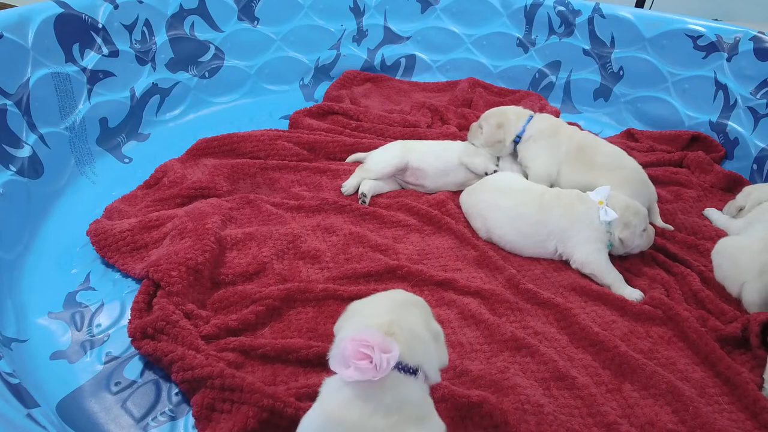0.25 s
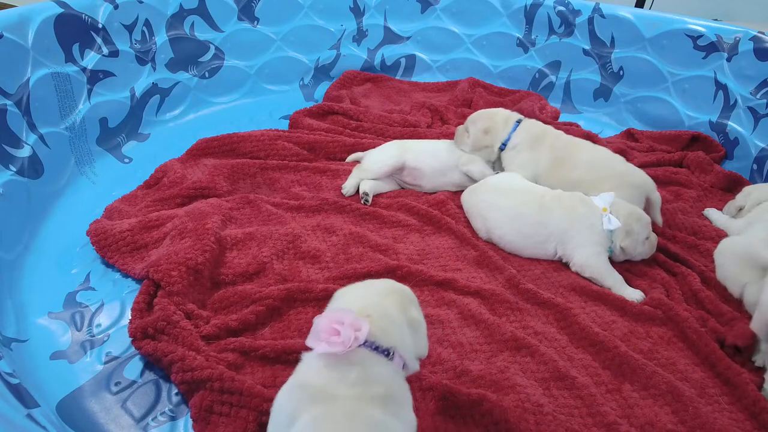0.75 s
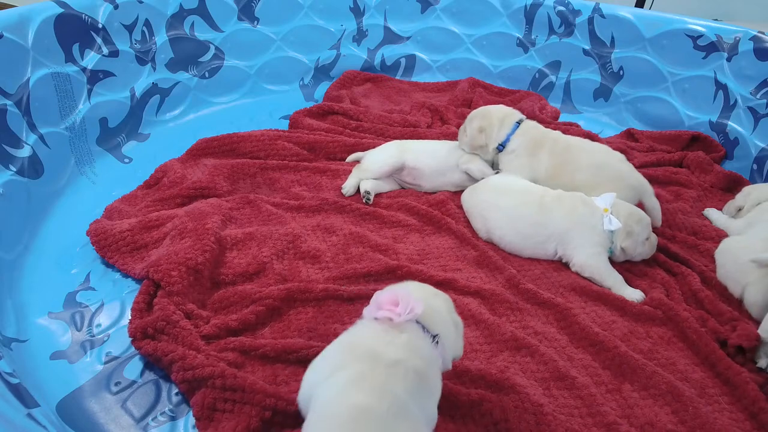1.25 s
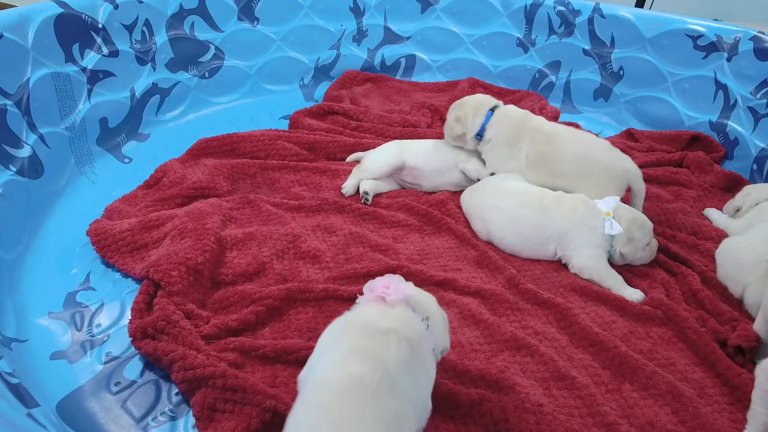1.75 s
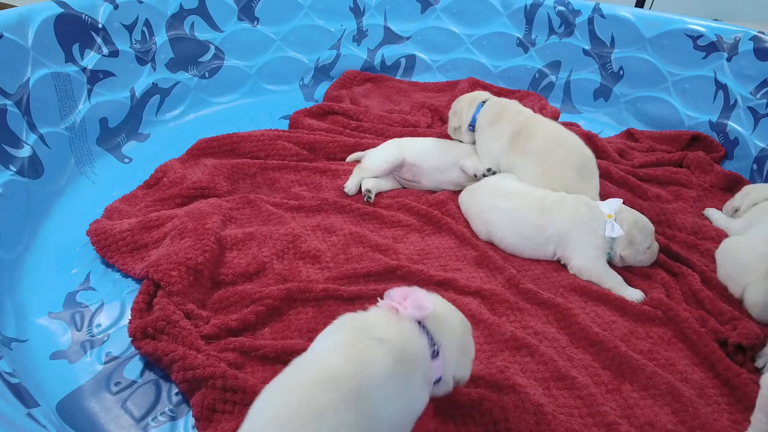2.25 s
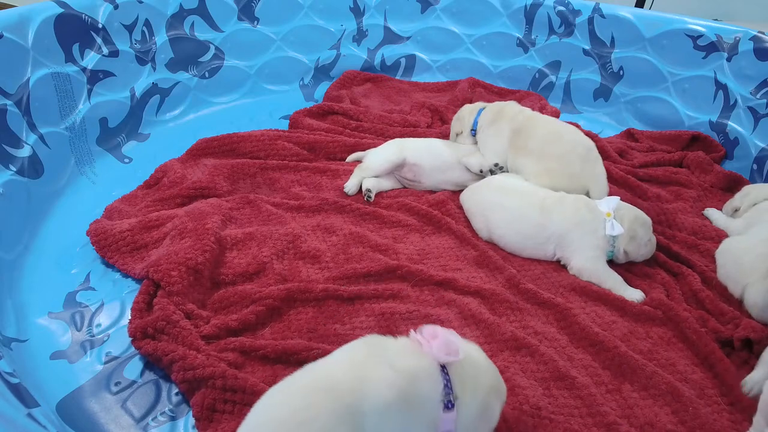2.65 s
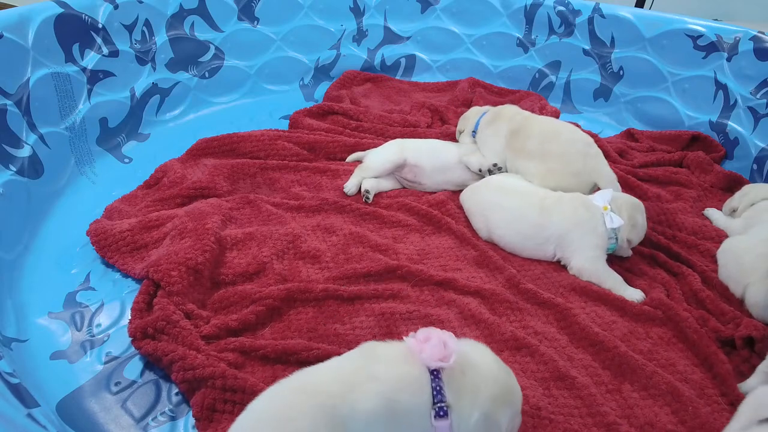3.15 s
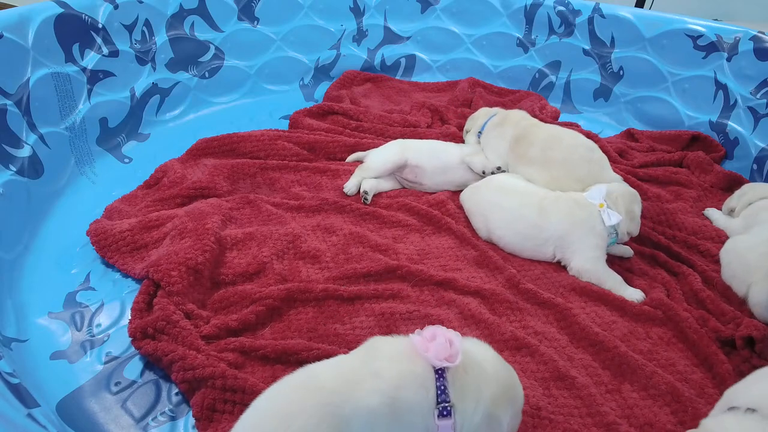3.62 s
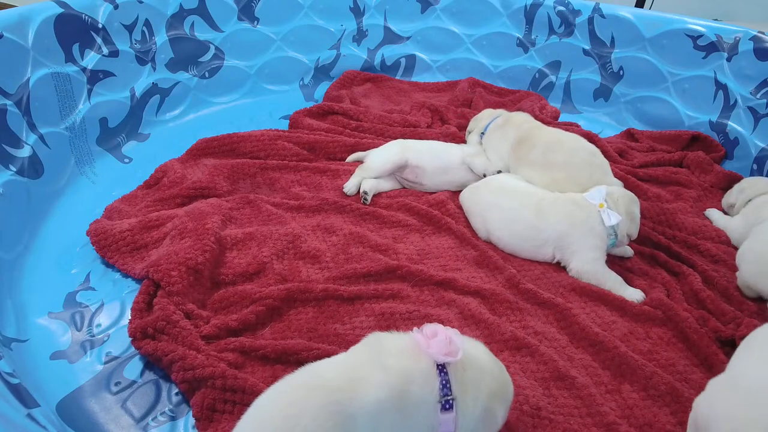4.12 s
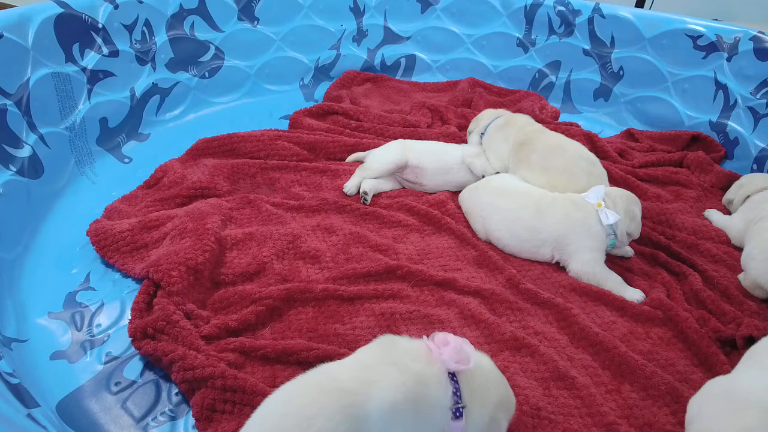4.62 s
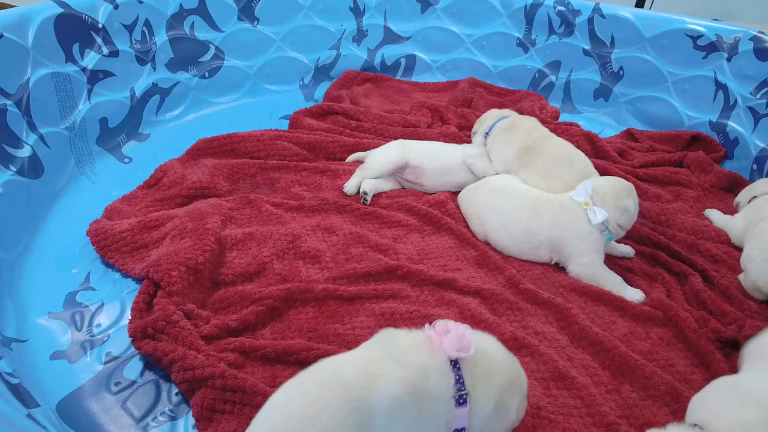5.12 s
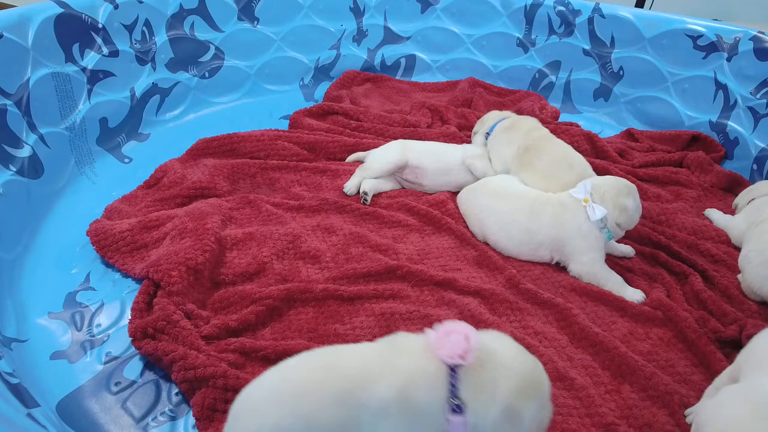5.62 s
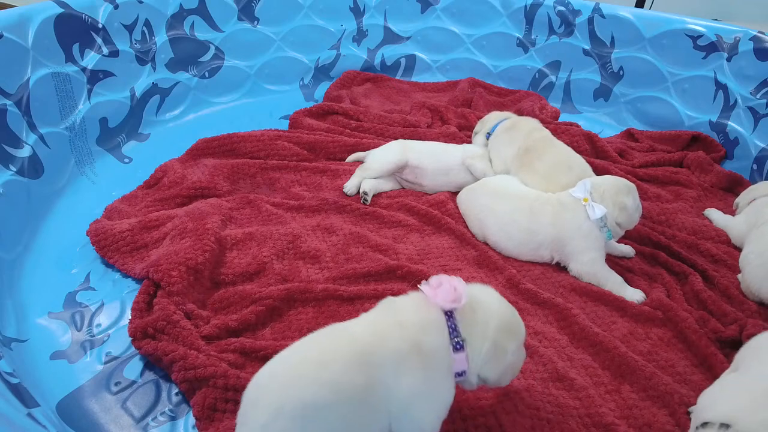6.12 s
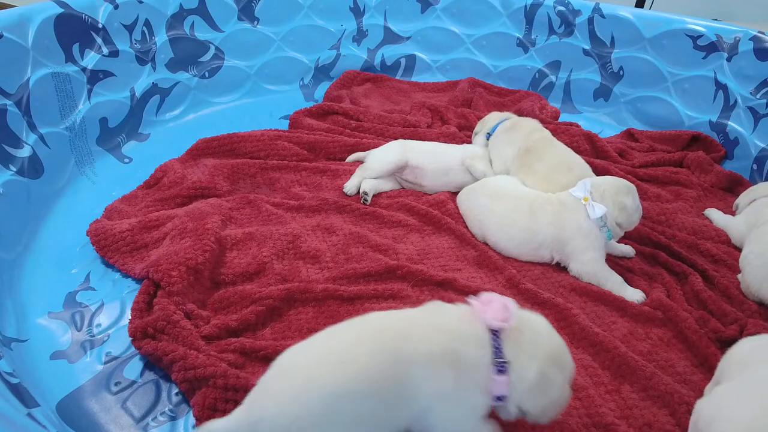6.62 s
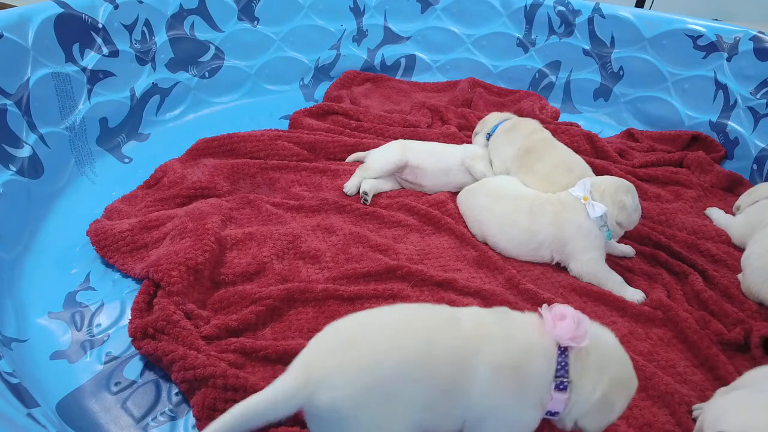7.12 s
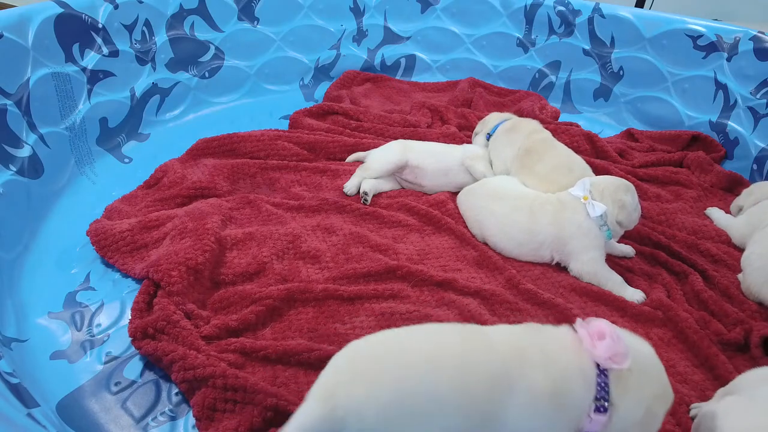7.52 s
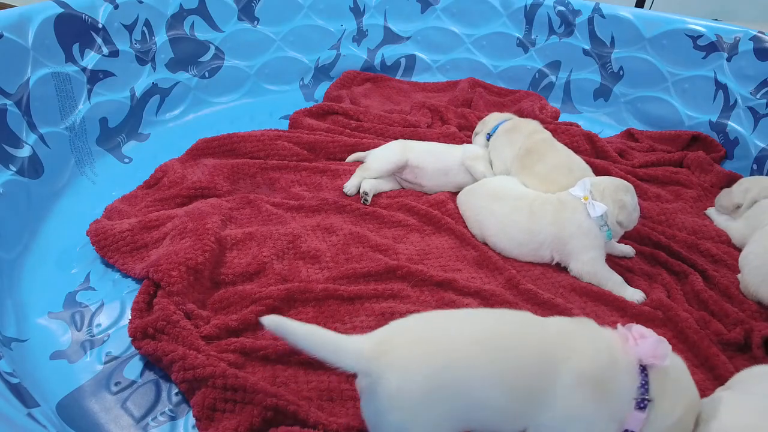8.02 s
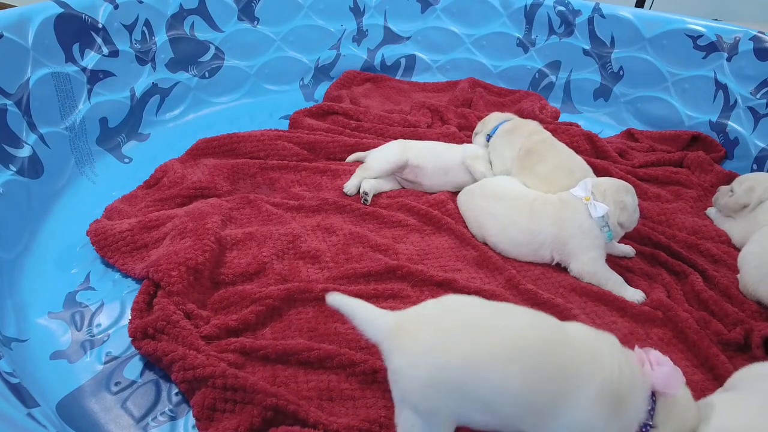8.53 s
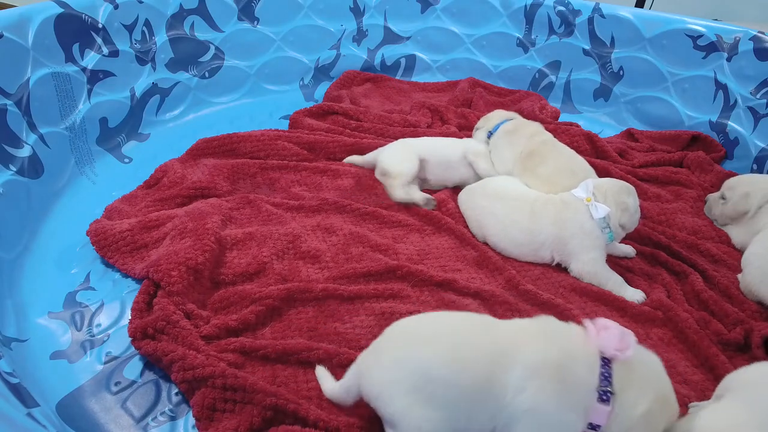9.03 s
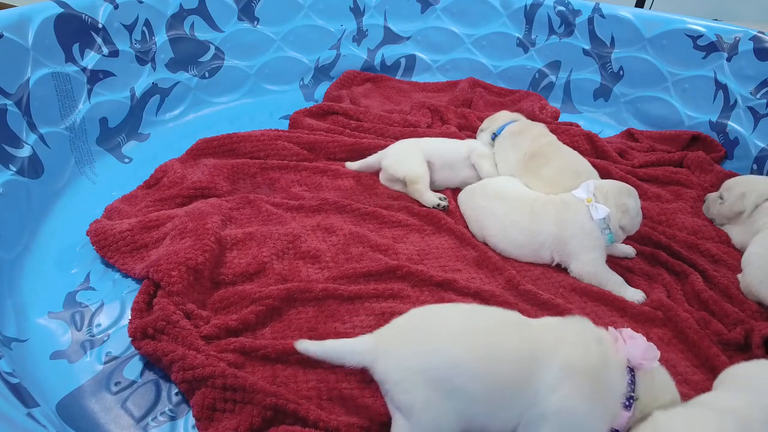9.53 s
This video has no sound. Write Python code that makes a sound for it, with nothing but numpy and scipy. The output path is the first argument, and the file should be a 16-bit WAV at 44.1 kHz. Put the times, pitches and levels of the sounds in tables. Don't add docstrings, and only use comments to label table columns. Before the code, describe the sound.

Tiny pup whimpers, a few snorts and one sharp sneeze, then a high falling whine and grumbling yelps, above soft fan hiss in a small live room.

```python
import sys
import numpy as np
from scipy import signal
from scipy.fft import rfft, irfft
from scipy.io import wavfile
from scipy.ndimage import uniform_filter1d

SR = 44100
rng = np.random.default_rng(int(sys.argv[2]) if len(sys.argv) > 2 else 0)


def bounce(signal):
    frames = np.transpose(np.atleast_2d(signal))
    limited = np.clip(frames, -1, 1)
    pcm = np.round(limited * 32767).astype(np.int16)
    wavfile.write(sys.argv[1], SR, pcm)


def elevation(decibels):
    levels = np.asarray(decibels, float)
    return 10 ** (levels / 20)


N = 430416


def evened(x):
    return x / np.sqrt(np.mean(x ** 2) + 1e-20)


def read(points, hz):
    f, value = np.transpose(points)
    return np.interp(np.log(hz + 1), np.log(f + 1), value)


def add(mix, s, sound):
    part = mix[max(round(s * SR), 0):][:len(sound)]
    part += sound[:len(part)]


def coloured(x, points, tilt_db=0.):
    hz = np.fft.rfftfreq(len(x), 1 / SR)
    gain_db = read(points, hz) + tilt_db * np.log2((hz + 100) / 5000)
    return irfft(rfft(x) * elevation(gain_db), len(x))


def band(x, hz, width):
    r = np.exp(-np.pi * width / SR)
    poles = [1, -2 * r * np.cos(2 * np.pi * hz / SR), r * r]
    once = signal.lfilter([1, 0, -1], poles, x)
    return evened(signal.lfilter([1, 0, -1], poles, once))


def ping(db, hz, cycles):
    u = np.arange(4000) / SR * hz
    swell = np.minimum(3 * u / cycles, 1)
    return 2 * elevation(db) * np.sin(2 * np.pi * u) * np.exp(-u / cycles) * swell


def heater():
    # f/Hz, density/dB per Hz
    fan_air = [(12, -65), (20, -34.5), (91, -7), (123, -13), (196, -14), (501, -4.5), (678, -14.5),
               (845, -8), (1210, -16.5), (1780, -14.5), (2470, -21), (7240, -29), (9020, -35), (13300, -31),
               (14400, -28.5)]
    # f/Hz, width/Hz, level/dB
    casing = [(121.7, 21, -79), (166.4, 2.8, -82.5), (536.8, 7.4, -75), (820, 17, -82), (390.6, 30, -81.5)]
    frames = N // 256 + 5
    real, imaginary, patches = rng.standard_normal((frames, 513, 3)).T
    patches = uniform_filter1d(uniform_filter1d(patches, 10, 0), 16, 1)
    cells = (real + 1j * imaginary) * elevation(1.8 * evened(patches))
    hiss = signal.istft(cells, nperseg=1024, noverlap=768)[1][:N]
    out = elevation(-66.5) * evened(coloured(hiss, fan_air))
    for f, width, db in casing:
        out = out + elevation(db) * band(rng.standard_normal(N), f, width)
    mains = np.sqrt(2) * np.sin(2 * np.pi * 120 * np.arange(N) / SR)
    return out + elevation(-75.5) * mains


def rustle():
    # middle t/s, lift/dB, half
    # length/s
    stirs = [(2.42, 21, 0.054), (3.807, -6, .6), (5.192, 7.5, 0.46), (7.126, 17, 0.35), (7.463, -8, 0.15),
             (9.032, 8.5, 0.41), (9.75, -12, 0.29)]
    # f/Hz, width/Hz, level/dB
    fibre_modes = [(8000, 590, -9.5), (9030, 560, -7.5), (11350, 400, -23), (13200, 580, -9.5)]
    t = np.arange(N) / SR
    stir_db = sum(db * np.maximum(1 - abs(t - s) / half, 0) for s, db, half in stirs)
    fuzz = sum(elevation(g) * band(rng.standard_normal(N), f, w) for f, w, g in fibre_modes)
    strokes = elevation(9.4 * np.tanh(band(rng.standard_normal(N), 86.8, 90)))
    return elevation(-81.5 + stir_db) * evened(fuzz * strokes)


def shaped(row, lift_db, arch, late, loudest, first_db, last_db):
    # pitch f/Hz, octave level/dB
    throat = [(340, 23), (470, 16), (560, -39), (700, -8.5), (850, -19), (1000, -12), (1200, -41),
              (1800, -39)]
    start, length, effort_db, first_hz, last_hz = row
    u = np.linspace(0, 1, num=12)
    glide = u ** (late if last_hz < first_hz else 1 / late)
    hz = (first_hz + (last_hz - first_hz) * glide) * (1 + arch * np.sin(np.pi * u))
    swell_db = np.interp(u, [0, np.clip(loudest, .1, .9), 1], [first_db, 0, last_db])
    return np.transpose([start + length * u, hz, effort_db + swell_db, lift_db + read(throat, hz)])


def call(rasp_db, rough, rows):
    # [f/Hz, level/dB]
    noses = [(0, [(1200, 3), (2400, 3), (2800, -10), (4400, -16), (5200, 7), (6200, 2), (7300, 8.5),
             (8300, -5), (10800, -1), (12500, -16.5)]), (.35, [(1200, 32), (2200, 3), (2800, -5),
             (4300, -5), (5200, 12.5), (6500, 8), (7800, 8), (9000, 5.5), (11000, 3), (13000, -30)]),
             (.9, [(1200, -3), (2200, 1), (2800, -30), (4500, -17), (5300, 11), (6200, 6), (6800, -25),
             (7800, 16), (8800, -4), (12000, -16)]), (5, [(1200, -7), (2200, -6), (2800, -23), (4600, -5),
             (5500, 14.5), (6700, 2), (7700, 9), (8600, -1), (12000, -13)]), (8.4, [(1200, 36), (2400, -3),
             (2900, -16), (4500, -21), (5200, -5.5), (5900, -5), (7200, -12), (8000, -2), (9200, 4),
             (10600, -7.5), (12500, -12.5)])]
    s, *columns = np.transpose(rows)
    nose = [points for start, points in noses if start <= s[0]][-1]
    t = np.arange(s[0], s[-1], 1 / SR)
    hz, effort_db, octave_db = (uniform_filter1d(np.interp(t, s, c), 200, mode="nearest") for c in columns)
    rough = np.clip(rough, 0, 1)
    slow, catches, air = rng.standard_normal((3, 15925))
    slow, air = slow[:len(t)], air[:len(t)]

    shake = evened(uniform_filter1d(uniform_filter1d(slow, 60), 60))
    growl = band(catches, 75.7, 72.7)[-len(t):]
    sag = .25 * shake - .3 * np.minimum(growl, 0) ** 2
    phase = 2 * np.pi * np.cumsum(hz * np.maximum(1 + rough * sag, 2 / 3)) / SR
    swing = np.maximum(1 + 2.4 * rough * growl, .1)

    upper = 0
    for k in range(3, 20):
        audible = k * hz < 15000
        upper = upper + elevation(read(nose, k * hz)) * audible * np.cos(k * phase + k * k)
    breath = evened(coloured(air * (1 + np.cos(phase)), [(600, -41)] + nose + [(16000, -43)]))
    rasp = elevation(rasp_db + 0.68 * (effort_db - effort_db.max()))
    rasp = rasp * np.minimum((t - t[0]) / 0.03, 1)
    folds = np.sin(phase) + elevation(octave_db) * np.sin(2 * phase)
    voice = np.sqrt(2) * swing * (folds + elevation(-1) * rasp * upper)
    fade = np.minimum((t - t[0]) / .018, (t[-1] - t) / .008)
    edge = np.sin(np.pi / 2 * np.minimum(fade, 1)) ** 2
    return elevation(effort_db) * edge * (voice + elevation(5.0) * rasp * breath)


def calls():
    # start t/s, length/s, effort level/dB, first f/Hz, last f/Hz
    cries = [(.06, 0.056, -52, 1006, 1054), (.15, 0.056, -55, 993, 1075), (.395, 0.0167, -43.5, 988, 976),
             (.998, 0.07, -48, 820, 904)]
    grumbles = [(0, .035, -63, 952, 852), (.078, .12, -55, 798, 719)]
    cheeps = [(.69, 0.027, -40.5, 1232, 1084), (3.2, 0.031, -39.5, 992, 1033),
              (3.44, 0.075, -39, 1194, 1151), (3.767, 0.052, -42.5, 1214, 1090),
              (5.272, 0.047, -33.5, 1025, 974)]
    squeaks = [(5.737, 0.048, -39, 803, 566), (9.135, 0.0456, -46, 793, 1163),
               (9.715, 0.042, -50.5, 607, 634)]
    yips = [(.966, 0.11, -47.5, 1200, 1219), (1.05, 0.043, -44.5, 874, 628),
            (2.4, 0.031, -38.5, 1762, 1715), (2.428, 0.095, -44, 1297, 1248),
            (2.472, 0.068, -42.5, 1444, 1354), (2.508, 0.056, -44, 1190, 1164),
            (2.816, 0.099, -47.5, 1250, 1239), (5.29, 0.06, -43.5, 848, 991),
            (9.126, 0.071, -37, 633, 770.5), (9.295, 0.027, -39, 682, 654)]
    growls = [(1.05, 0.075, -45.5, 1135, 904), (2.85, 0.076, -42, 1280, 1216)]
    snarls = [(2.835, 0.125, -44.5, 1040, 898)]
    moans = [(9.4, 0.22, -50.5, 707.4, 813)]
    rasps = [(6.88, 0.066, -49.5, 1170, 1002), (6.884, 0.045, -55, 820, 814),
             (6.89, 0.061, -56, 1605, 1617)]
    blips = [(9.34, 0.033, -40.5, 1000, 940), (9.362, 0.045, -35.5, 710, 607),
             (9.365, 0.069, -43, 1100, 970), (3.815, 0.05, -48.5, 940, 1120), (.54, .13, -44, 900, 970),
             (2.125, 0.025, -57.5, 1180, 1030), (3.812, 0.03, -50, 1010, 900)]
    whimpers = [(3.468, .075, -44.5, 1248, 1240), (3.49, 0.085, -46.5, 1005, 928)]
    sighs = [(3.147, 0.105, -36, 1245, 1180), (0.066, 0.13, -51, 1260, 1100)]
    # t/s, pitch f/Hz, effort level/dB, octave level/dB
    first_yip = [(.094, 786, -43, -16), (.11, 775, -37.5, -4), (.125, 843, -39.5, -4),
                 (.138, 941, -39.5, 0), (.147, 823, -40, -3.5), (.165, 801, -36.5, -22),
                 (.19, 795, -45.5, -8), (.207, 740, -46, -24)]
    yelp = [(.402, 683, -33, -8), (.422, 777, -40, 0.5), (.432, 1009, -40.5, 7.5), (.445, 896.5, -34.5, -3),
            (.465, 926, -36, 2.5), (.49, 976.4, -34, 4), (.503, 982, -30, 3), (.512, 805, -39.5, 2),
            (.525, 650, -32, 4)]
    hook = [(7.224, 912, -46.5, -25.5), (7.238, 850, -39.5, -44), (7.248, 712, -39.5, -16),
            (7.258, 786, -39, -13.5), (7.267, 877, -33.5, -17), (7.29, 880, -44.5, -31)]
    whine = [(8.536, 1294, -43, -33), (8.57, 1464, -51.5, -34), (8.62, 1850, -55.5, -37),
             (8.7, 1756, -40.5, -58), (8.76, 1842, -45, -40), (8.8, 1780, -39.5, -35),
             (8.825, 1657, -37, -35), (8.852, 1374, -40.5, -31)]
    wail = [(8.793, 1506, -39, -38), (8.82, 1237, -45, -44), (8.85, 886.4, -42, -4),
            (8.89, 850.4, -47.5, -2.5), (8.915, 855, -41.5, -6.5), (8.935, 766.6, -41.5, -15),
            (8.96, 871, -48, -4), (8.99, 774, -55, -3)]
    reply = [(9.09, 1027, -56, 4), (9.13, 912.3, -41.5, -14), (9.148, 1002, -39, -8),
             (9.178, 1021, -40.5, -12.5), (9.2, 896, -37.5, -14), (9.225, 790, -35.5, -12),
             (9.26, 752, -38, -26)]
    steady = [(6.912, 959, -40, -32), (6.93, 927, -30.5, -38), (6.946, 933, -29.5, -32),
              (6.965, 879, -33, -6), (6.976, 899, -45, -12), (6.995, 943.5, -33, -10.5),
              (7.022, 917, -32, -22), (7.031, 910, -39.5, -29), (7.105, 917, -53, -12)]
    lead_in = [(2.045, 1380, -61, -45), (2.08, 1502, -61, -45), (2.098, 1550, -44, -45),
               (2.114, 1569, -46.5, -45), (2.126, 1473, -63, -45), (2.143, 1470, -47, -45),
               (2.16, 1570, -47.5, -45), (2.175, 1510, -43, -45)]
    low_whine = [(9.155, 353.4, -52, -4), (9.19, 374.5, -50, 11), (9.21, 458.5, -40.5, 2),
                 (9.24, 457.3, -41, 6.5), (9.265, 473, -41, 1), (9.315, 491, -54, -8)]
    groan = [(9.44, 555, -38, -12), (9.48, 564.3, -51, -16), (9.52, 549, -44, -19), (9.55, 520, -42, -12),
             (9.6, 476.6, -57, -17), (9.643, 516, -51, -23)]
    drop_call = [(.5, 467, -47, -5), (.515, 489, -34, -2), (.53, 487, -50, 12), (.54, 492, -43.5, 2),
                 (.56, 477, -39, -4)]
    rise_call = [(5.355, 1020, -43, -16), (5.37, 1066, -43, -18), (5.39, 1092, -44, -33),
                 (5.41, 1094, -45, -30), (5.43, 1102, -46, -19), (5.46, 1105, -51, -26),
                 (5.49, 1090, -53, -25), (5.53, 1119, -60, -21), (5.553, 1136, -48, -24)]
    clear, husky, growly = .045, .1, .25
    manners = [
        (cries, -25, 0.071, -3, 16.5, 0.0115, 1.14, 0.53, 5.4, 1),
        (grumbles, -21, 0.25, -.1, -2, 0.15, 1.1, 0.64, 16, 15),
        (cheeps, -43.5, clear, -3.5, -14, 0.0061, 1.4, 0.89, -14.5, -1.3),
        (squeaks, -49, clear, -2.6, -3.5, 0.0087, 1.53, 0.16, 1.2, -1),
        (yips, -29, clear, 0.27, -0.56, 0.00855, 2.2, 0.12, 2.7, -1.7),
        (growls, -28, 0.16, -4, -23, 0.008, 2.7, 0.62, 0.83, 4.2),
        (snarls, -36, 0.37, -5, -29, .02, 1.5, 0.9, -7.5, -2),
        (moans, -37, growly, -1.8, -5, 0.0086, 2.3, 0.75, -0.71, -20),
        (rasps, -36, growly, 4, -2.2, 0.0089, 1.15, 0.39, -2.5, -2),
        (blips, -37, clear, -7.5, -10.5, 0.0094, 1.49, 0.2, -1.5, -0.87),
        (whimpers, -32, 0.061, -5, -11, 0.0203, 0.92, 0.087, -8, -6.5),
        (sighs, -45, clear, -9, -13, 0.0089, 1, .55, -17, -19)]
    # curve, rasp/dB, roughness 0-1, room send/dB
    voices = [
        (first_yip, -31.5, 0.075, -6.5), (yelp, -21.5, 0.0575, -5),
        (hook, -42.5, clear, -.1), (whine, -33.5, 0.0194, -.1),
        (wail, -23.5, 0.0694, -.1), (reply, -22.5, 0.0407, -1.3),
        (steady, -58, 0.023, -11), (lead_in, -44, 0.021, -1),
        (low_whine, -41, husky, -6.5), (groan, -57, 0.207, -6.5),
        (drop_call, -50, clear, -13), (rise_call, -24.5, husky, -9)]
    for rows, rasp_db, rough, send_db, *shape in manners:
        voices += [(shaped(row, *shape), rasp_db, rough, send_db) for row in rows]

    near, sent = np.zeros((2, N))
    for rows, rasp_db, rough, send_db in voices:
        voice = call(rasp_db, rough, rows)
        add(near, rows[0][0], voice)
        add(sent, rows[0][0], elevation(send_db) * voice)
    return near, sent


def clicks():
    # t/s, peak level/dB, f/Hz, decay/cycles
    smacks = [(0.443, -32, 6500, 2.3), (0.448, -35.5, 3040, 2.3), (0.449, -39, 4800, 4.1),
              (1.731, -53, 5520, 30.), (1.729, -57, 2920, 15), (1.745, -47.5, 4220, 10),
              (1.748, -45.5, 5900, 13), (1.748, -47, 5200, 12), (1.746, -41, 7000, 3.5),
              (1.749, -48, 8700, 11), (1.754, -69, 4670, 440), (2.169, -44.5, 3560, 14),
              (2.174, -46, 4050, 8.8), (2.175, -49, 5200, 9), (2.175, -49, 5830, 8),
              (2.339, -42, 5600, 2.5), (2.176, -41, 8000, 5), (2.176, -37, 12500, 3.4),
              (3.415, -52, 4000, 1.2), (3.431, -42.5, 3370, 7.7), (3.434, -41, 3800, 7.4),
              (3.435, -44, 4330, 7), (3.432, -40, 5130, 15), (5.639, -54, 2700, 0.77),
              (6.956, -32, 5800, 8), (6.956, -28, 8500, 8), (6.9, -55, 6200, 6), (6.914, -52, 6400, 6.6),
              (9.596, -35, 2420, 3.3), (9.597, -33, 3590, 10), (9.592, -37, 4480, 6),
              (9.596, -50, 1490, 13)]
    # t/s, peak level/dB, f/Hz, decay/cycles
    low_chirps = [(.222, -50, 820, 5.3), (.267, -42.5, 820, 4.8), (.307, -49, 794, 4.9),
                  (5.293, -41, 811, 8.5), (9.541, -37, 712, 2.8), (9.55, -41, 660, 3.2)]
    out = np.zeros(N)
    for s, db, hz, cycles in smacks + low_chirps:
        add(out, s, ping(db, hz, cycles))
    return out


def sneeze(db, rise, tilt_db, whistle_hz):
    # f/Hz, density/dB per Hz
    jet_colour = [(290, -28), (500, -1.5), (653, -10.5), (829, -1), (1540, -5.5), (1720, -4), (1900, -2.5),
                  (3840, 0), (5380, 2), (11500, -4), (14400, -16.5)]
    t = np.arange(SR // 4) / SR
    air, spit = rng.standard_normal((2, len(t)))
    whistle = elevation(-15.5) * band(air, whistle_hz, 600)
    jet = evened(coloured(air, jet_colour, tilt_db)) + whistle
    sputter = elevation(2.75 * evened(uniform_filter1d(spit, 160)))
    burst = np.minimum(t / rise, 1) ** 1.1 * np.exp(-np.maximum(t - rise, 0) / .022)
    return elevation(db) * jet * sputter * burst


def sneezes():
    # t/s, level/dB, rise/s, brightness/dB an octave, whistle f/Hz
    puffs = [(0.425, -47, 0.11, 5, 5800), (1.723, -53, 0.029, 1.5, 4600), (2.154, -48.5, 0.036, 1.5, 5430),
             (2.335, -46, 0.043, -0.5, 5500), (3.41, -51.5, 0.044, 2.5, 4800), (3.539, -60, 0.058, 4, 5600),
             (4.181, -48, 0.033, -0.5, 4070), (4.765, -70, 0.072, 14, 10300), (5.664, -68, 0.034, 9, 8500),
             (6.109, -75, 0.016, -2, 6440), (6.937, -31, 0.026, 4.5, 5670), (9.572, -42, 0.027, -1.5, 5400)]
    out = np.zeros(N)
    for s, *shape in puffs:
        add(out, s, sneeze(*shape))
    return out


def paws():
    # t/s, peak level/dB, f/Hz
    pushes = [
        (1.941, -59.5, 221),
        (4.269, -61, 137),
        (7.12, -55, 150),
        (7.137, -55, 172),
        (7.183, -58.5, 143),
    ]
    out = np.zeros(N)
    for s, db, hz in pushes:
        add(out, s, ping(db, hz, 1.3))
    return out


def room(x):
    # f/Hz, t60/s
    decay = [(150, 0.73), (500, 0.5), (1000, 0.44), (2000, 0.42), (5000, 0.44), (12000, 0.36)]
    taps = np.zeros(SR)
    at = np.arange(200, SR - 12, 12) + rng.integers(0, 12, (SR - 201) // 12)
    taps[at] = rng.choice([-1., 1.], at.shape)
    hz, t, z = signal.stft(taps, SR, nperseg=256)
    t60 = read(decay, hz)[:, None]
    early_db = -0.5 * np.exp(-t / 0.081)
    onset = np.minimum(t / 0.0035, 1)
    tail = signal.istft(z * elevation(early_db - 60 * t / t60) * onset, SR, nperseg=256)[1]
    return signal.fftconvolve(x, tail / np.linalg.norm(tail))[:N]


def scene():
    bass_cut = [(110, -40), (250, 0), (16000, 0)]
    near, sent = calls()
    puffs, wet = sneezes(), clicks()
    near = coloured(near + puffs + wet, bass_cut)
    sent = coloured(sent + puffs + elevation(-1.5) * wet, bass_cut)
    return (near + room(sent) + paws() + heater() + rustle())[None]


def band_limit(x):
    return signal.sosfilt(signal.butter(12, 14550, fs=SR, output="sos"), x)


def record(dry):
    # f/Hz, level/dB
    mic_response = [(20, -11), (45, 3.5), (11900, -4), (12300, -2.5), (12800, -9), (13800, -4),
                    (14300, -13), (14700, -29)]
    return band_limit(coloured(dry[0], mic_response)[None])


dry = scene()
out = record(dry)
bounce(out)
```